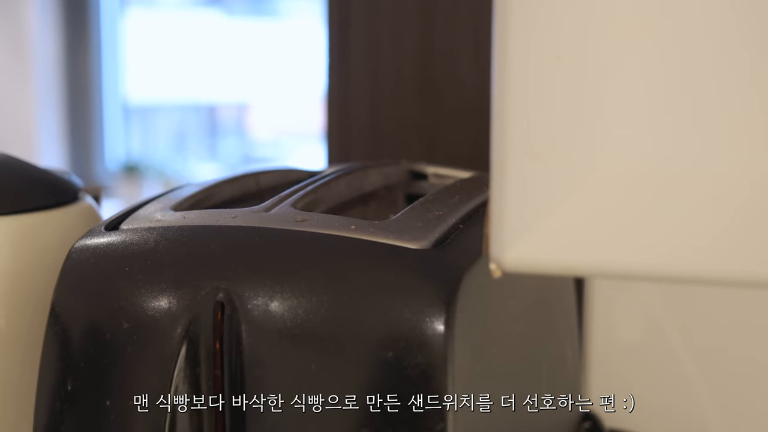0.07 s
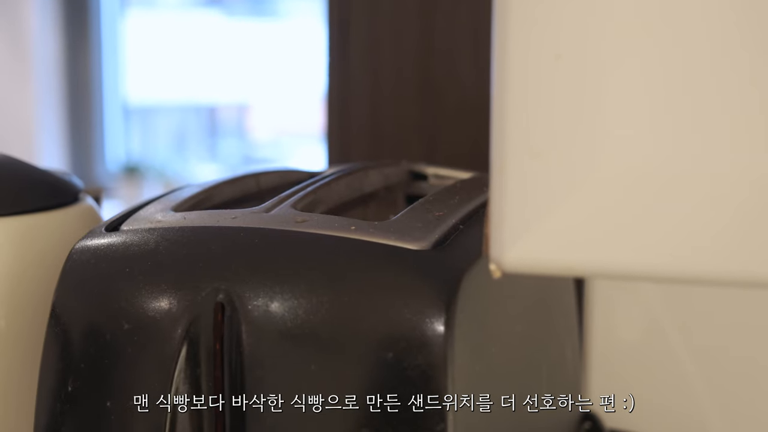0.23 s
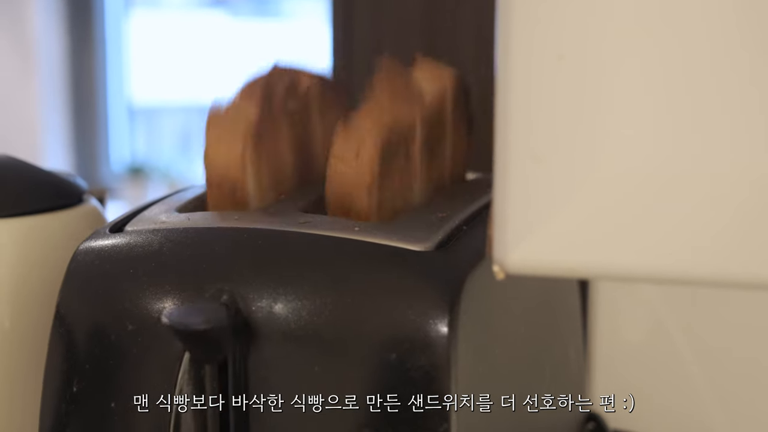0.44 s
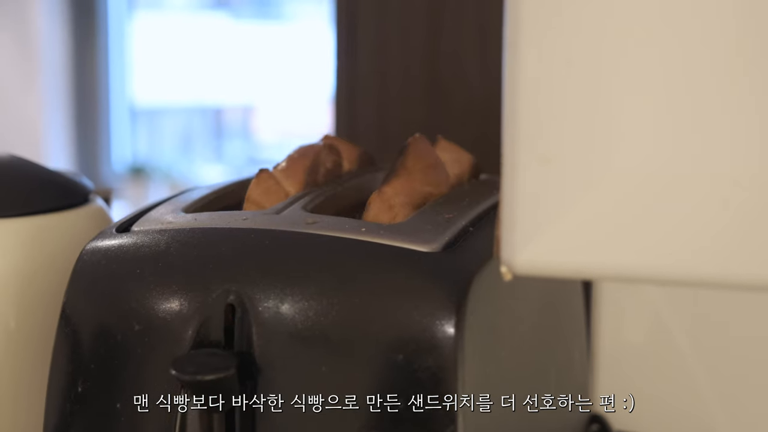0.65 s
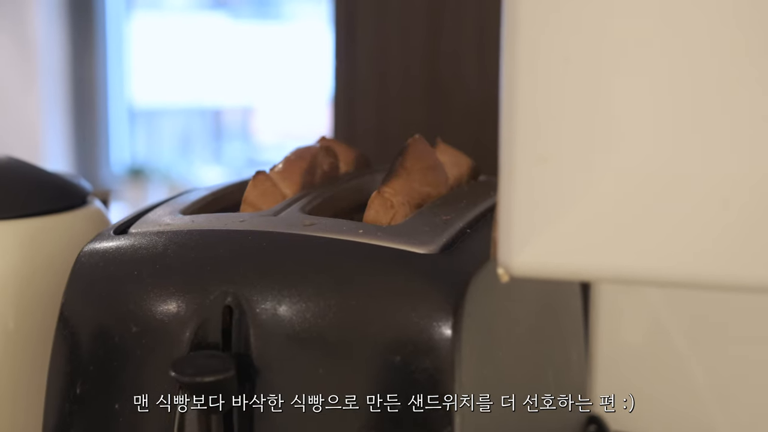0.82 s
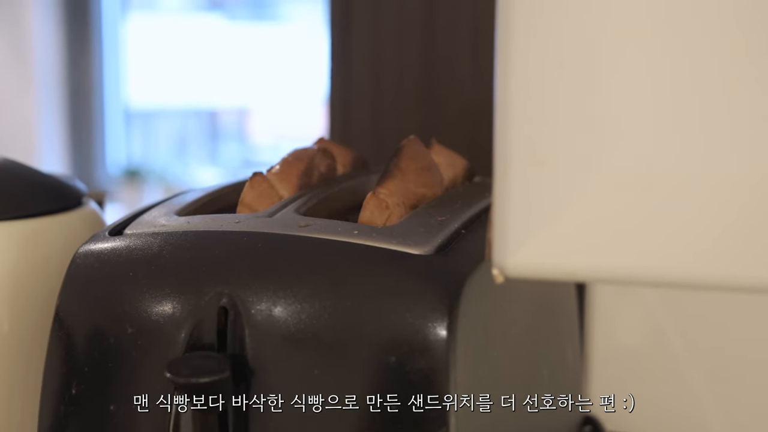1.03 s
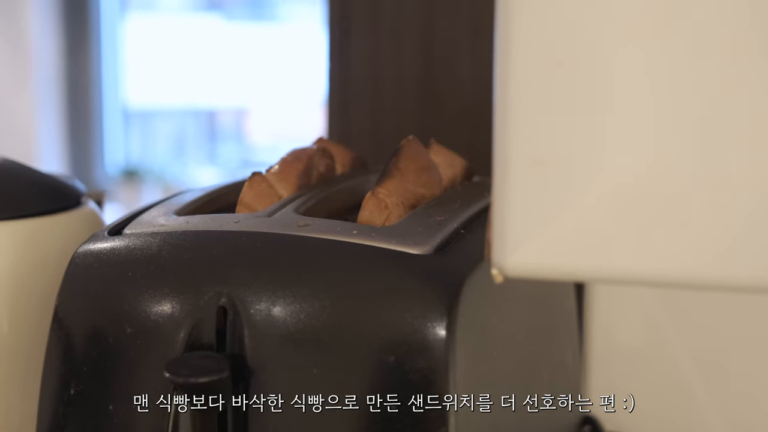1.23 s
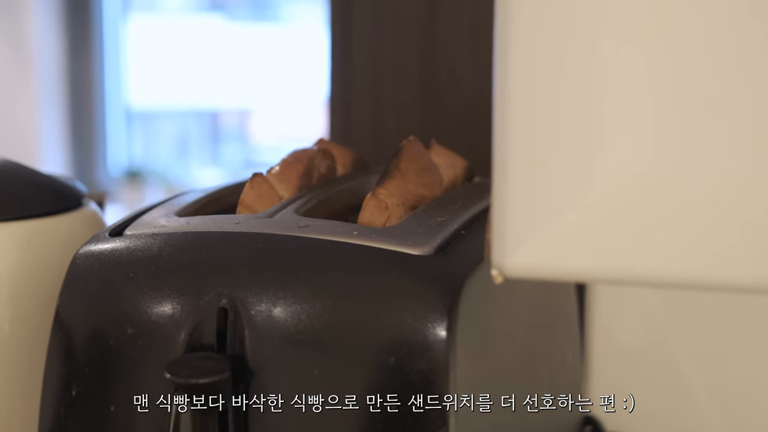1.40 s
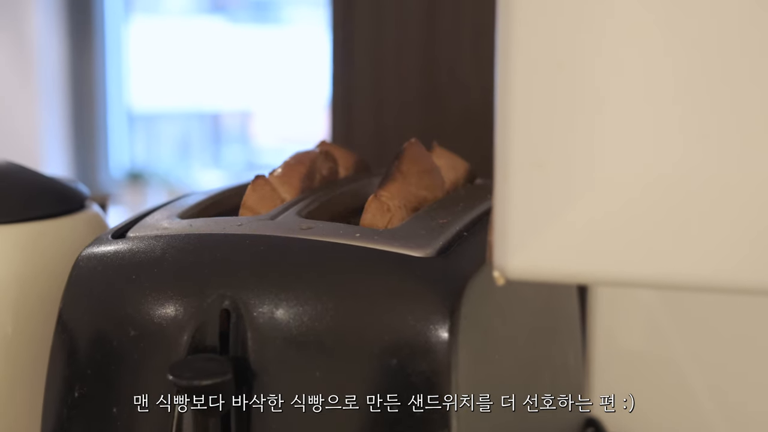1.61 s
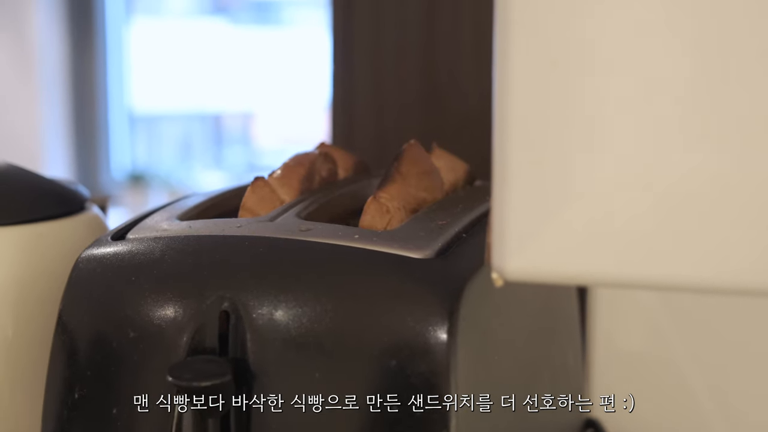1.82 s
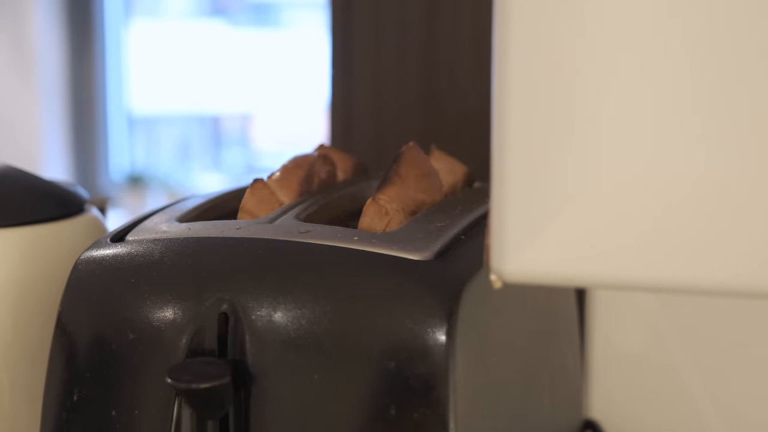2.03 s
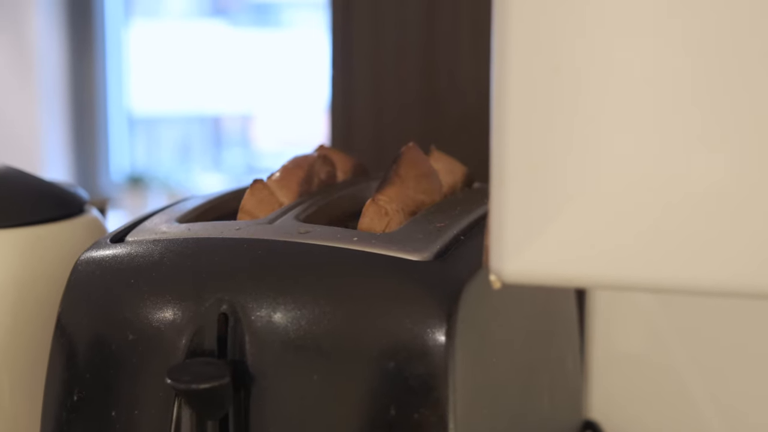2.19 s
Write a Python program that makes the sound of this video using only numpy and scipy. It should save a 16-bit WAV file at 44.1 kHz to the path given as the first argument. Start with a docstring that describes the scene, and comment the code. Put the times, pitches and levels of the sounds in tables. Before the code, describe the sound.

A toaster pops up with a sharp metallic clack and a brief springy rattle.

```python
"""A quiet kitchen hums and hisses faintly. After a quarter of a second a toaster's latch lets go,
and the sprung carriage (the bread holder) knocks upward and slams into its metal stop.
The spring shivers while the toast drops back with hollow thuds and scrapes down the wire guides,
which clink to rest. The room's ring dies away, and three soft, distant thumps follow, like footsteps."""
import sys
import numpy as np
from scipy import signal
from scipy.fft import rfft, irfft, next_fast_len
from scipy.io import wavfile

SR = 44100
rng = np.random.default_rng(int(sys.argv[2]) if len(sys.argv) > 2 else 0)


def pcm_store(signal):
    """Save signal as 16-bit PCM."""
    levels = np.round(np.clip(np.atleast_2d(signal), -1, 1) * 32767)
    wavfile.write(sys.argv[1], SR, levels.astype(np.int16).T)


N = 103635

# Steady tones of the mains hum: (multiple of the mains frequency, level [dB])
HUM_TONES = [(1, -52), (3, -73), (7, -71.5)]
# The hum's wavering 100 Hz tone: (time [s], level [dB])
HUM_WAVER = [(0, -57.5), (.4, -51.5), (.6, -51.5), (1.15, -57), (1.46, -50), (1.7, -52), (2.0, -57),
             (2.3, -51)]
# Electrical whine: (frequency [Hz], level [dB])
WHINE_TONES = [(544, -91), (592, -79), (1238, -81), (2205, -80), (2853, -85.5), (3316, -78.5), (3490, -85),
               (3570, -83)]

# How long the kitchen rings: (frequency [Hz], time to fade by 60 dB [s])
ROOM_RING = [(200, .8), (600, 1.05), (2000, 0.91), (5000, 0.72), (14000, 0.2)]
# How much left and right differ in hiss, echo and direct sound: (frequency [Hz], gain [dB])
HISS_WIDTH = [(60, -15.5), (110, -12), (200, -6), (380, -6), (700, -5), (1290, -3.5), (2380, -4.5),
              (4400, -2), (8120, 0.5), (15000, 1.5)]
ECHO_WIDTH = [(500, -40), (1400, -32), (2800, -21), (5000, -5), (8500, -1), (15000, -1.5)]
DIRECT_WIDTH = [(2200, -48), (4400, -15), (8000, -10), (15000, -14.5)]

# When and how hard each hit lands: (time [s], strength [dB])
THUMPS = [(1.004, 0.5), (1.611, 1), (2.209, -2)]
THUDS = [(.3892, -2), (.3932, -2), (.409, -4), (.423, -8), (.447, -11.5), (.492, -21.5), (.668, -19.5)]
BUMPS = [(.295, 2), (.345, 0.5), (.49, 4), (.57, 3), (.63, -0.5), (.705, -2.5)]
CLINKS = [(.491, -1.5), (.5415, -1), (.552, -7.5), (.595, -7.5), (.678, -11), (.731, -16), (.922, -27.5)]
CRUST_TICKS = [(.543, -2), (.597, -7), (.680, -4), (.704, -5), (.731, -9), (.741, -7), (.922, -21)]
LATCH_CLICKS = [(.2417, 0.5), (.2440, -2), (.2475, -8), (.2575, -26)]
KNOCKS = [(.2621, -3), (.2659, -6.5), (.2675, -2.5)]
SLAMS = [(.2700, 0.5)]

# Each sound's colour, its balance of bass and treble: (frequency [Hz], gain [dB])
HISS_COLOUR = [(25, 5), (70, -1.5), (130, -2), (230, -2.5), (330, -7.5), (660, -11), (900, -13),
               (1700, -17.5), (3400, -16), (4800, -22), (11800, -30.5), (16000, -44.5)]
THUMP_COLOUR = [(40, -6), (90, -6), (140, -5), (200, 0), (270, -8.5), (380, -20), (800, -43), (3000, -56)]
ECHO_COLOUR = [(80, -16), (220, -4), (500, -9.5), (1200, -10), (2500, -8), (5000, -8), (14000, -4)]
THUD_COLOUR = [(50, 15), (140, 11.5), (330, 18.5), (460, 28.5), (750, 16.5), (1500, 12.5), (2500, 5.5),
               (5000, 6), (8000, -6), (15000, -10)]
BUMP_COLOUR = [(50, -2.5), (95, 5.5), (135, 4.5), (190, 11.5), (250, 8.5), (500, -6.5), (2000, -38.5)]
CLINK_COLOUR = [(150, -23), (700, -2), (1600, -2), (2800, -1.5), (5000, -0.5), (6800, -7), (8000, -12.5),
                (10000, -11.5), (15000, -16)]
CRUST_COLOUR = [(1000, -30), (4000, -22), (5100, 0), (6000, -17), (7100, -9.5), (8200, -21), (10500, -16),
                (13000, -29), (15500, -22)]
SHIVER_COLOUR = [(150, -42), (500, -14), (1500, 16.5), (2400, 18), (3400, 9.5), (5300, 10.5), (7500, 5.5),
                 (15000, -5)]
LATCH_COLOUR = [(100, -5.5), (280, -3), (450, 20.5), (1000, 10), (1800, 8.5), (5200, 4), (6500, -17),
                (15000, -30)]
KNOCK_COLOUR = [(40, -34), (90, 0.5), (150, 13.5), (280, 25.5), (450, 21.5), (1000, 17), (2500, 8),
                (6500, 6), (9000, -4.5), (15000, -20.5)]
SLAM_COLOUR = [(80, 2.6), (350, 13), (600, 15), (1200, 5.7), (2200, 9.1), (3500, 3.5), (4500, 17.1),
               (5800, 15), (7500, 7), (15000, 7)]

# The tones a part rings with when hit: (frequency [Hz], level [dB], time to fade by 60 dB [s])
SHELL_TONES = [(214, -43, 0.35), (400, -30.5, 0.08), (491.6, -28.5, 0.095), (585, -47, 0.12),
               (713, -32, 0.087), (926, -25, 0.1), (1423, -35.5, 0.12)]
WIRE_TONES = [(1580, -37, .15), (1900, -30.5, 0.036), (1913, -33.5, 0.034), (4240, -60, 0.074),
              (5270, -38, 0.073), (5230, -51, 0.069), (5350, -55, .08), (6200, -46, .08)]  # landing() limits these fade times
CASE_TONES = [(277, -16, .055), (478, -20.5, 0.041), (733, -25.5, .045), (960, -22, 0.069),
              (1180, -35.5, 0.067), (1433, -23, .05), (1860, -22, .035)]
SLAM_TONES = [(294, -32.5, .25), (481, -36, .25), (2285, -39.5, 0.32), (2893, -46.5, 0.24),
              (3892, -42.5, .25), (4350, -7, 0.012), (4620, -41.5, .4), (5080, -32.5, 0.175),
              (5210, -24.5, .1), (5670, -8.5, 0.016)]

TIME = np.arange(N) / SR  # seconds


def undb(db):
    """Turn decibels into a number to multiply by."""
    return 10 ** (np.asarray(db) / 20)


def along(points, hz):
    """Read between the rows of a (frequency, value) table, giving each octave equal room."""
    freqs, values = np.array(points, float).T
    return np.interp(np.log(np.maximum(hz, 1)), np.log(freqs), values)


def colour(x, points):
    """Filter a sound by a (frequency, gain) table."""
    size = 2 * next_fast_len(N)
    gains = undb(along(points, np.arange(size // 2 + 1) * SR / size))
    cepstrum = irfft(np.log(gains))
    # Folding this onto its first half makes the filter ring only after a hit, never before.
    cepstrum[1:size // 2] *= 2
    cepstrum[size // 2 + 1:] = 0
    return irfft(rfft(x, size) * np.exp(rfft(cepstrum)))[:N]


def fade(seconds):
    """A curve that falls by 60 dB in the given time."""
    return np.exp(-np.minimum(np.log(1000) * TIME / seconds, 100))


def noise(points):
    """Coloured noise with an average (rms) size of 1."""
    x = colour(rng.standard_normal(N), points)
    return x / x.std()


def convolve(x, response):
    """Let every sample of a sound set off a copy of the response."""
    return signal.fftconvolve(x, response)[:N]


def smear(x, fade_s):
    """Spread every sample into a short, dying puff of noise."""
    puff = fade(fade_s) * rng.standard_normal(N)
    return convolve(x, puff / np.linalg.norm(puff))


def stereo(mid, side):
    """Make left and right from what they share (mid) and how they differ (side)."""
    return np.array([mid + side, mid - side])


def background(mains_hz=50, drift_hz=4, hiss_db=-58.5):
    """Mains hum, a faint electrical whine that drifts in pitch, and room hiss."""
    wavering_db = np.interp(TIME, *np.array(HUM_WAVER).T)
    tones = HUM_TONES + [(2, wavering_db)]
    hum = sum(undb(db) * np.cos(2 * np.pi * multiple * mains_hz * TIME) for multiple, db in tones)
    whine = np.zeros(N)
    for hz, db in WHINE_TONES:
        drift = drift_hz * np.interp(TIME, np.linspace(0, N / SR, 20), rng.standard_normal(20))
        whine += undb(db) * np.sin(2 * np.pi * np.cumsum(hz + drift) / SR)
    hiss = stereo(noise(HISS_COLOUR), colour(noise(HISS_COLOUR), HISS_WIDTH))
    return np.sqrt(2) * (hum + whine) + undb(hiss_db) * hiss


def thumps(rise_s=0.049, level_db=-48.5):
    """Dull, distant thumps: low noise that swells and dies away."""
    ages = [(np.maximum(TIME - start_s, 0) / rise_s, db) for start_s, db in THUMPS]
    swells = sum(undb(db) * age * np.exp(1 - age) for age, db in ages)
    return undb(level_db) * noise(THUMP_COLOUR) * swells


def kitchen(x, build_s=0.019):
    """Hard walls send back a dense ring of echoes; left and right differ mainly in the treble."""
    hz = np.arange(N // 2 + 1) * SR / N
    build = 1 - np.exp(-TIME / build_s)
    centres_hz = np.geomspace(100, 16000, 8)
    tails = np.zeros((2, N))
    spectra = rfft(rng.standard_normal((2, N)))
    for centre, pick in zip(centres_hz, np.eye(len(centres_hz))):  # each band fades at its own pace
        band = irfft(spectra * along(list(zip(centres_hz, pick)), hz), N)
        envelope = build * fade(along(ROOM_RING, centre))
        tails += band * envelope / np.linalg.norm(envelope)
    reflected = colour(x, ECHO_COLOUR)
    direct_side = colour(smear(x, fade_s=0.008), DIRECT_WIDTH)
    echo_side = colour(convolve(reflected, tails[1]), ECHO_WIDTH)
    return stereo(x + convolve(reflected, tails[0]), direct_side + echo_side)


def scrape(middle_s=0.539, spread_s=0.058, level_db=-30):
    """Dry crust slides down the wire guides in a short, grainy swell."""
    swell = np.exp(-((TIME - middle_s) / spread_s) ** 2 / 2)
    rubbing = rng.standard_normal(N)
    grain_db = 3 * np.repeat(rng.standard_normal(N // 100 + 1), 100)[:N]  # changes every 100 samples
    return undb(level_db) * colour(swell * rubbing * undb(grain_db), CLINK_COLOUR)


def strike(hits, tint, tones, rattle_s, crack_share, rise_s):
    """Each hit is a sharp crack plus a short rattle, and sets any tones of the part ringing."""
    cracks, rattle = np.zeros(N), np.zeros(N)
    burst = fade(rattle_s) * (1 - np.exp(-TIME / rise_s))
    burst /= np.linalg.norm(burst)
    for start_s, db in hits:
        start = int(start_s * SR)
        cracks[start] += undb(db)
        rattle[start:] += undb(db) * (burst * rng.standard_normal(N))[:N - start]
    sound = colour(np.sqrt(crack_share) * cracks + np.sqrt(1 - crack_share) * rattle, tint)
    if tones:
        ring = sum(undb(db) * fade(ring_s) * np.sin(2 * np.pi * hz * TIME) for hz, db, ring_s in tones)
        sound += convolve(cracks, ring)
    return sound


def landing(longest_wire_ring_s=0.14):
    """Carriage and toast thud back down; the case bumps, the wire guides clink and the crust ticks."""
    thuds = strike(THUDS, THUD_COLOUR, SHELL_TONES, rattle_s=0.04, crack_share=0.2, rise_s=0.0005)
    bumps = strike(BUMPS, BUMP_COLOUR, [], rattle_s=0.074, crack_share=0.21, rise_s=0.002)
    wires = [(hz, db, min(ring_s, longest_wire_ring_s)) for hz, db, ring_s in WIRE_TONES]
    clinks = strike(CLINKS, CLINK_COLOUR, wires, rattle_s=0.07, crack_share=0.015, rise_s=0.0015)
    crust = strike(CRUST_TICKS, CRUST_COLOUR, [], rattle_s=0.07, crack_share=0.01, rise_s=0.002)
    return thuds + bumps + clinks + crust


def shiver(start_s=0.2834, rise_s=0.018, fade_s=0.74, ticks_per_s=700, level_db=-17.5):
    """The jolted spring buzzes against the cage in dense, dying ticks."""
    age = np.maximum(TIME - start_s, 0)
    ticks = (rng.random(N) < ticks_per_s / SR) * rng.choice([-1, 1], N)
    strengths = undb(3 * rng.standard_normal(N))  # ticks vary by about 3 dB
    swing = np.minimum(age / rise_s, 1) * np.exp(-np.log(1000) * age / fade_s)
    buzz = smear(ticks * strengths * swing, fade_s=0.0093)
    return undb(level_db) * colour(buzz, SHIVER_COLOUR)


def carriage():
    """The latch clicks open; the carriage knocks the case on its way up and hits the stop."""
    latch = strike(LATCH_CLICKS, LATCH_COLOUR, [], rattle_s=0.032, crack_share=0.05, rise_s=0.00069)
    knocks = strike(KNOCKS, KNOCK_COLOUR, CASE_TONES, rattle_s=0.041, crack_share=0.5, rise_s=0.000397)
    slam = strike(SLAMS, SLAM_COLOUR, SLAM_TONES, rattle_s=0.032, crack_share=0.5, rise_s=0.0001)
    return latch + knocks + slam


def scene():
    """The toaster rings through the kitchen, over distant thumps, hum and hiss."""
    toaster = carriage() + shiver() + scrape() + landing()
    return kitchen(toaster) + thumps() + background()


def record(dry):
    """Flatten any peaks beyond 0.88, then cut the treble above 15800 Hz."""
    treble_cut = signal.ellip(10, 0.2, 80, 15800, fs=SR, output="sos")
    return signal.sosfilt(treble_cut, np.clip(dry, -0.88, 0.88))


dry = scene()
out = record(dry)
pcm_store(out)
```